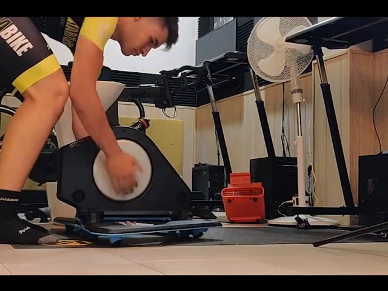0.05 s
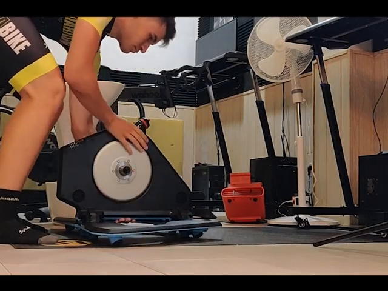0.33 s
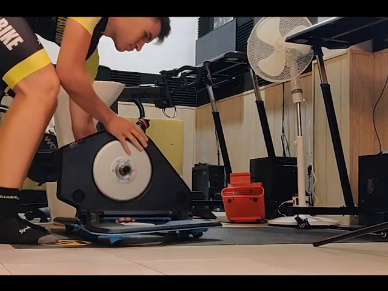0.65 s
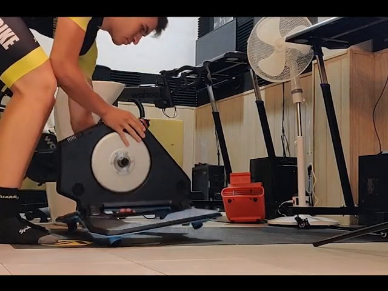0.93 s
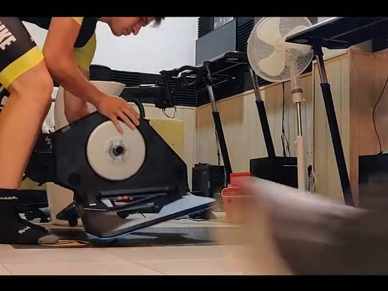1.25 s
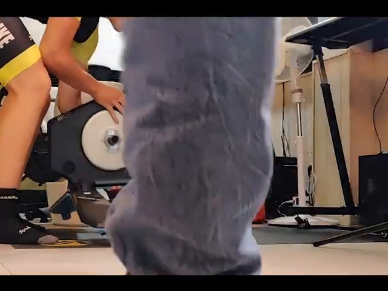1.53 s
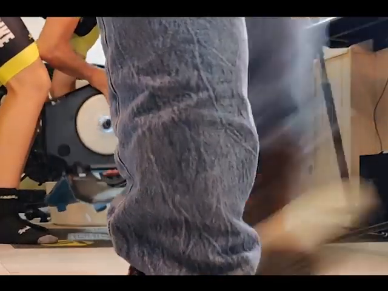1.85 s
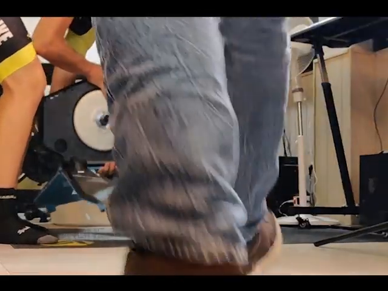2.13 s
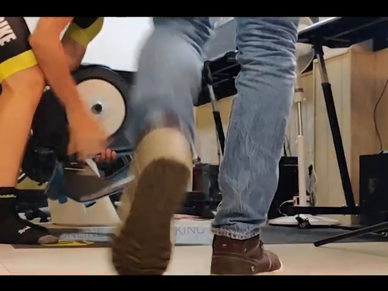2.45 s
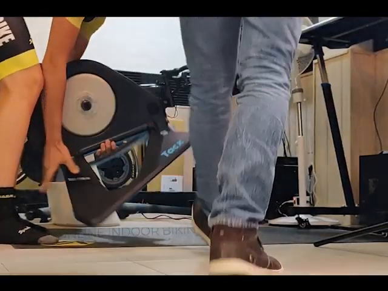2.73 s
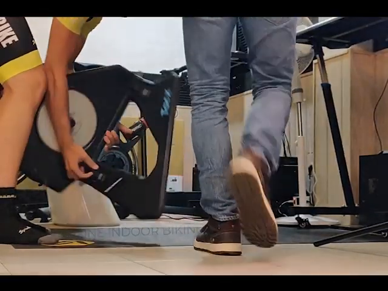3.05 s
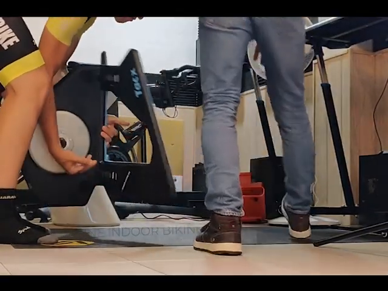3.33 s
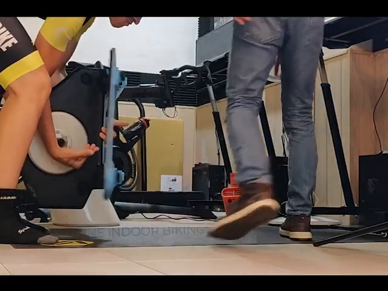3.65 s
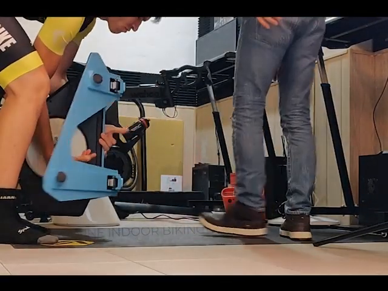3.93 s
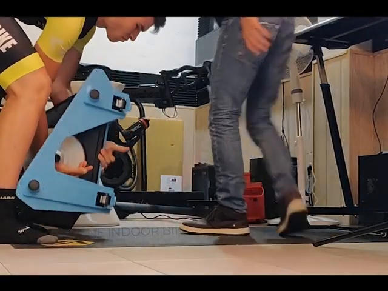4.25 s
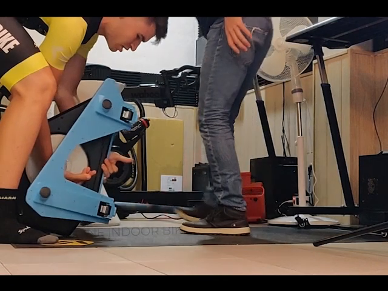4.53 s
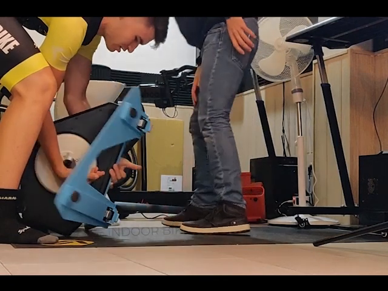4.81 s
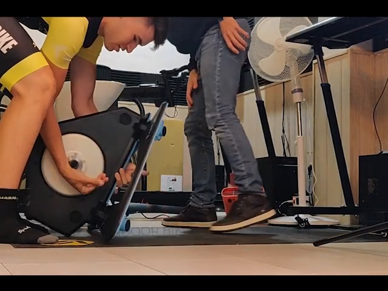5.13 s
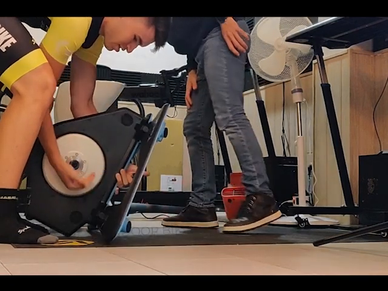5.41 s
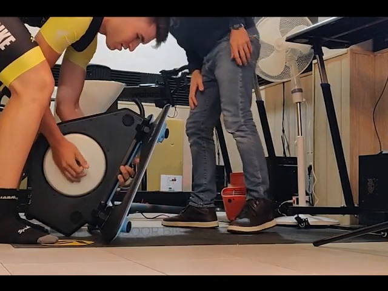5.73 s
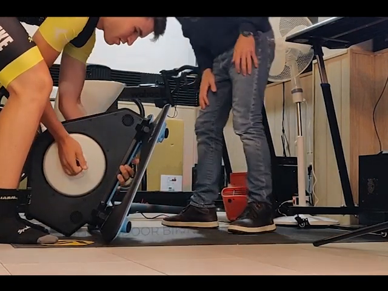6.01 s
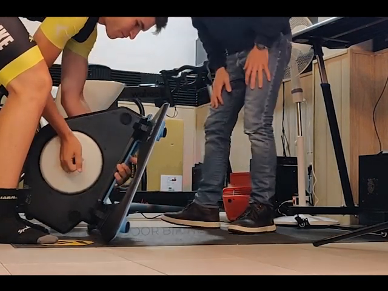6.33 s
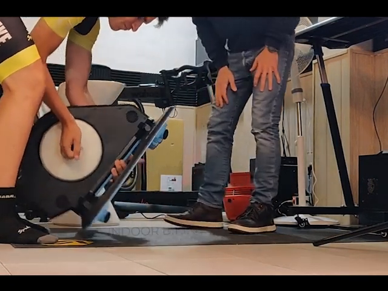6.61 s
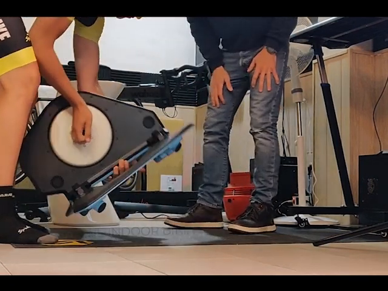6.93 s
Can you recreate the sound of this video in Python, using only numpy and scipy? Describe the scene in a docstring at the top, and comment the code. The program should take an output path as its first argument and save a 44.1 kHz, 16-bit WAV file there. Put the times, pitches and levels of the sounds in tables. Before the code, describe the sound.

Close to the microphone in a small room, the hollow plastic housing of an exercise trainer knocks and rattles as it is handled. Soft bumps and a few passing footsteps lead to several groups of hard clacks from its hinges and latches. After the loudest clatter the base settles with a brief low rumble, and small knocks and one more click trail off. Faint rubbing, creaking and a low ventilation hum lie underneath.

```python
"""A folded exercise trainer is lifted, turned and its legs swung open, near a phone on a shop floor.
Blows excite the damped modes of its hollow plastic housing, and the harder ones rattle its hinges.
Hinges and latches snap in bursts of tiny impacts; hands and clothes rub and creak by stick-slip friction.
Someone walks past close by, each heel a damped thump, and the base rumbles as it settles on the mat.
The short reverberation of the small room and a quiet ventilation noise lie around it."""
import sys
import numpy as np
from scipy import signal
from scipy.fft import rfft, irfft
from scipy.io import wavfile
from scipy.ndimage import uniform_filter1d

SR = 44100
rng = np.random.default_rng(int(sys.argv[2]) if len(sys.argv) > 2 else 0)


def unload_audio(sound):
    """Save the sound as a 16-bit wav file, at the path given as the first command line argument."""
    columns = np.transpose(np.atleast_2d(sound))
    # keep every value between -1 and 1, then stretch to whole-number steps
    steps = np.round(np.clip(columns, -1, 1) * 32767)
    wavfile.write(sys.argv[1], SR, steps.astype(np.int16))


N = 311787
TIME = np.arange(N) / SR
AGE = TIME[:SR // 2]  # time since an impact, s
REFERENCE_DB, REFERENCE_HZ = -30, 450  # the typical blow, from which the others are scaled

# blows on the housing: t/s, body level/dB, clatter level/dB, favoured f/Hz
KNOCKS = [ (0.005, -58, -44, 1010), (0.108, -54, -45, 470), (0.699, -40.5, -47, 302),
          (0.735, -50, -41, 900), (0.902, -39, -41.5, 620), (1.158, -39, -47.5, 290),
          (1.368, -42.5, -42, 534), (1.922, -42, -45, 312), (2.076, -31.5, -50, 270),
          (2.399, -47, -57, 167), (2.569, -38, -43, 470), (2.699, -43.5, -49.5, 470),
          (2.844, -41, -46.5, 187), (2.884, -29.5, -45, 330), (2.931, -11, -14, 516),
          (2.943, -14, -24.5, 420), (2.966, -31, -36, 189), (3.058, -25.5, -30, 724),
          (3.094, -29, -32, 894), (3.341, -41.5, -35, 680), (3.362, -34.5, -41.5, 423),
          (3.502, -13.5, -18, 536), (3.575, -34, -31, 503), (3.758, -13.5, -30.5, 485),
          (3.765, -13.5, -24, 453), (4.498, -31.5, -37, 507), (4.519, -25, -27.5, 330),
          (4.54, -28.5, -43, 224), (4.85, -34.5, -45.5, 383), (4.863, -34, -46.5, 510),
          (5.056, -46.5, -39.5, 333), (5.129, -6.5, -12.5, 514), (5.15, -13, -15, 396),
          (5.174, -10, -21, 378), (5.286, -25, -27, 940), (5.292, -24, -50, 380), (5.544, -44.5, -52, 288),
          (5.605, -58, -46.5, 820), (5.783, -41.5, -50, 343), (5.805, -37, -47, 527),
          (6.018, -40, -46.5, 364), (6.153, -43, -45.5, 372), (6.24, -43.5, -44, 339),
          (6.45, -43.5, -47, 360), (6.983, -49, -46, 390)]
# hinge and latch snaps: t/s, steel level/dB, plastic level/dB, sizzle level/dB, chatter T60/s
SNAPS = [(0.9673, -27.5, -44, -30.5, 0.025), (0.9701, -26.5, -26.5, -41, 0.022),
         (2.879, -47.5, -50, -60, 0.036), (2.9304, -15.5, -15, -25, 0.063), (3.623, -42, -39, -56, 0.11),
         (3.638, -40, -37.5, -46, 0.015), (4.5018, -45, -50.5, -45, 0.14),
         (4.6477, -30.5, -27.5, -31.5, 0.064), (4.6736, -33, -42, -51, 0.062),
         (4.9656, -45, -42, -57, 0.08), (5.1051, -15, -22.5, -22, 0.081), (5.1243, -41, -17, -41, 0.087),
         (6.3156, -31.5, -37, -41, 0.064), (6.338, -29, -31, -36.5, 0.035)]
# modes of the housing: f/Hz, level/dB, ring time as a multiple of the blow's
HOUSING_MODES = [(111, -34, 0.53), (159.2, 3, 2.96), (226, -29, 3.5), (273.7, 1, 1.43), (356.6, -1.5, 2.15),
                 (401, -1, 1.8), (428.5, 0.5, 1.63), (518.6, 7, 0.99), (566, -12.5, 3.4), (678, -3.5, 1.3),
                 (794, -5, 1.7), (810, 1, 0.62), (895, 0, 0.66), (1000, -3.5, 0.41), (1051, -4, 1.06),
                 (1138, -13, 2.7), (1280, -11.5, 0.99), (1536, -4.5, 0.27), (1750, -19.5, 1.3),
                 (1870, -23, 1.4), (2140, -29, 1.2)]


def housing_knocks(body_db=-5, boom_db=-6, clatter_db=-6, panel_db=-4, focus_octaves=0.21):
    """Modal superposition: each blow rings the shell. Returns the direct sound and the room's share."""
    # spectrum of the dense, weak panel modes: f/Hz, level/dB
    panel_spectrum = [(80, -22.5), (300, 3.5), (550, 3), (1000, -9.5), (1600, -11), (2500, -23.5),
                      (4000, -39.5)]
    out, to_room = np.zeros(N), np.zeros(N)
    mode_hz, mode_db, ring_ratio = np.transpose(HOUSING_MODES)
    for s, db, high_db, pitch in KNOCKS + latch_kicks():
        low_db, t60, wet_db = shell_response(db, pitch)
        push_s = 0.00044 * 2 ** ((db - high_db) / 7.5)  # a padded contact clatters less, pushes longer
        emphasis = 1 + 3 * np.exp(-(np.log2(mode_hz / pitch) / focus_octaves) ** 2)
        gains = undb(mode_db) * emphasis * rng.choice([-1, 1], len(mode_hz))
        tuning = mode_hz * (1 + 0.013 * rng.standard_normal(len(mode_hz)))  # the grip shifts the modes
        modes = np.array([g * ring(hz, t60 * k) for g, hz, k in zip(gains, tuning, ring_ratio)])
        panel_noise = colour(rng.standard_normal(SR), panel_spectrum)
        parts = [(90, 245, low_db + boom_db, 0.0024),  # heavy base, slow to move
                 (245, 720, db + body_db, push_s),  # hollow shell
                 (720, 3000, high_db + clatter_db, 0.00064)]  # thin covers
        for lo, hi, part_db, rise_s in parts:
            tones = modes[(mode_hz >= lo) & (mode_hz < hi)].sum(0)
            panels = cut(panel_noise, [lo, hi], "band", order=3)[-len(AGE):] * fade(t60 * 0.99)
            ringing = level(tones, 0, size=900) + level(panels, panel_db, size=900)
            onset = 1 - np.exp(-(AGE / rise_s) ** 2)
            part = level(ringing * onset, part_db, size=900)
            add(out, s, part * undb(-3 if hi > 1000 else 0))  # the covers radiate mostly sideways
            add(to_room, s, part * undb(wet_db))
    return cut(out, 98, "high"), to_room


def shell_response(db, pitch):
    """Excitation and damping: a blow's strength and pitch set its boom, ring time and room share."""
    force_db = db - REFERENCE_DB
    boom_db = -46.5 + 0.76 * force_db - 12.5 * np.log2(pitch / REFERENCE_HZ)  # low blows move the base
    t60 = 0.078 * 2 ** (-force_db / 84)  # a firmer grip damps the shell
    wet_db = -2 - 0.16 * force_db  # light touches blur into the room
    return boom_db, t60, wet_db


def latch_kicks(delay_s=0.002944, hz=387):
    """Reaction force: each snap kicks the housing around the latch. Rows as in KNOCKS."""
    return [(s + delay_s, plastic_db - 1, plastic_db - 3.5, hz) for s, _, plastic_db, _, _ in SNAPS]


def latch_snaps(grain_db=6.0, crack_t60=0.0093, contact_s=0.00088):
    """Impact chatter: a hard contact and a dying train of tiny impacts excite steel and plastic."""
    # spectrum of a snap: f/Hz, level/dB
    snap_spectrum = [(300, -9), (1000, 10), (2100, 5.5), (3300, 1), (4600, -6), (5700, -5), (6600, 2.5),
                     (8000, -5), (9600, -12), (11500, -3.5), (13500, 1), (16000, -7.5)]
    # modes of the steel latch parts: f/Hz, level/dB, T60/s
    latch_modes = [(5450, 4, 0.014), (6430, 10, 0.024), (6670, -8, 0.039), (7300, -16, .04)]
    # modes of the plastic catches: f/Hz, level/dB, T60/s
    catch_modes = [(1160, -1, 0.053), (1750, -7, 0.039), (2018, 1, 0.029), (2340, -6, 0.046),
                   (3100, -8, 0.027)]
    out = np.zeros(N)
    for s, steel_db, plastic_db, sizzle_db, t60 in SNAPS + hinge_rattles():
        impacts = undb(grain_db * np.repeat(rng.standard_normal(len(AGE) // 16 + 1), 16)[:len(AGE)])
        envelope = (fade(t60) + 0.69 * fade(crack_t60)) * (1 - np.exp(-AGE / contact_s))
        chatter = rng.standard_normal(len(AGE)) * impacts * envelope
        click = colour(flatten(chatter[None], bins=51)[0], snap_spectrum)
        steel = level(cut(click, [4200, 9000], "band", order=3), 0, size=500)
        steel += level(struck(latch_modes, detune=0.038), -10, size=500)
        plastic = level(cut(click, [110, 4000], "band", order=4), 0, size=500)
        plastic += level(struck(catch_modes, detune=0.031), -5, size=500)
        sizzle = cut(click, 9500, "high", order=4)
        for part, db in (steel, steel_db - 7.5), (plastic, plastic_db - 5), (sizzle, sizzle_db - 4):
            add(out, s, level(part, db, size=500))
    return out


def hinge_rattles(threshold_db=-41.5, slope=0.19, t60=0.047):
    """Backlash: hard knocks shake the loose hinges, whose play limits the level. Rows as in SNAPS."""
    shaken = [(s, -46 + slope * (clatter_db - REFERENCE_DB))
              for s, _, clatter_db, _ in KNOCKS if clatter_db > threshold_db]
    return [(s, db, db + 4, db - 13, t60) for s, db in shaken]


def footsteps(thump_t60=0.017, heel_hz=330, heel_t60=0.0056, tap_t60=0.0008, scuff_t60=0.08):
    """Damped impact: a rubber heel gives a short push and a thump, and the sole scuffs briefly."""
    # shoes on the floor: t/s, level/dB, thump f/Hz, heel cutoff f/Hz, relative scuff level/dB
    footfalls = [(0.634, -38, 132.4, 405, -12), (1.4525, -20.5, 158, 1070, -17.5),
                 (1.551, -35, 150, 1050, -1), (1.617, -43, 140, 494, -6), (2.241, -34, 155, 844, -5)]
    out = np.zeros(N)
    for s, db, thump_hz, cutoff_hz, scuff_db in footfalls:
        push = ring(thump_hz, thump_t60) + ring(heel_hz, heel_t60) + undb(6) * fade(tap_t60)
        scuff = undb(scuff_db) * rng.standard_normal(len(AGE)) * fade(scuff_t60)
        cushioned = cut(push + scuff, cutoff_hz, "low", order=3)  # a harder heel passes more treble
        add(out, s, -level(cut(cushioned, 109, "high"), db, size=600))
    return out


def mat_shudders(band_ratio=1.64):
    """Damped vibration: a band of low noise dies away as the base settles on the mat."""
    # the weight coming down: t/s, level/dB, T60/s, centre f/Hz
    settlings = [(4.509, -41, 1, 51), (5.136, -36, 0.43, 110)]
    out = np.zeros(N)
    for s, db, t60, hz in settlings:
        rumble = cut(rng.standard_normal(len(AGE)), [hz / band_ratio, hz * band_ratio], "band")
        add(out, s, level(rumble * fade(t60), db, size=4000))
    return out


def rubbing(uneven_db=4.5, flutter_db=0.5, grain_db=1.5):
    """Friction noise: sliding surfaces catch and slip, so the drag is grainy."""
    # spectrum of a hand on plastic: f/Hz, level/dB
    hand_spectrum = [(100, -7), (160, -2), (220, -3), (350, 5), (550, 2), (900, -3), (1800, -11),
                     (3000, -46.5)]
    # spectrum of sliding cloth: f/Hz, level/dB
    cloth_spectrum = [(700, -8), (1800, 1.5), (3000, -3), (4600, -5.5), (6800, 2.5), (9500, -13.5),
                      (13500, -7.5), (16000, -6.5)]
    rub, swish = sliding()
    grain = undb(grain_db * wander(400))
    drag = level(colour(diffuse(N), hand_spectrum), 0) * rub * undb(uneven_db * wander(36))
    cloth = level(colour(diffuse(N), cloth_spectrum), 0) * swish * undb(flutter_db * wander(82))
    return (drag + cloth) * grain


def creaks(rate_hz=45, scatter_db=5, burst_t60=0.016, ring_t60=0.043):
    """Stick-slip: sliding plastic lets go in irregular ticks that ring the thin covers."""
    rub, _ = sliding()
    slips = (rng.random(N) < rate_hz / SR) * undb(scatter_db * rng.standard_normal(N).clip(-2, 1))
    bursts = signal.fftconvolve(slips, fade(burst_t60))[:N] * rng.standard_normal(N)
    cover_modes = [(hz, db, ring_t60 * k) for hz, db, k in HOUSING_MODES if hz > 950]
    covers = signal.fftconvolve(slips, struck(cover_modes, detune=0.024))[:N]
    ticks = level(cut(bursts, [700, 2500], "band"), 0) + level(covers, -2)
    return level(ticks, -3) * rub / 2


def sliding(grip_rub_db=-65, grip_swish_db=-68.5):
    """Friction envelopes, rub and swish: each slide swells above a grip that never quite rests."""
    # hands, soles and clothes sliding: middle t/s, half length/s, rub level/dB, swish level/dB
    slides = [(0.37, 0.16, -68, -58), (0.732, 0.066, -46.5, -57), (1.512, 0.16, -58, -61),
              (1.807, 0.057, -53, -71), (2.088, 0.04, -39.5, -50), (2.34, 0.093, -50.5, -57.5),
              (2.603, 0.035, -54, -59), (2.91, 0.017, -43, -59), (3.405, 0.42, -57, -71),
              (3.657, 0.036, -53, -58), (4.302, 0.075, -54, -65.5), (4.63, 0.035, -47, -78),
              (5.63, 0.2, -61.5, -64.5), (6.47, 0.058, -53.5, -76), (6.803, 0.06, -68, -59)]
    swells = np.array([np.exp(-((TIME - s) / half) ** 2) for s, half, _, _ in slides])
    return undb(np.transpose(slides)[2:]) @ swells + undb([[grip_rub_db], [grip_swish_db]])


def direct_path(x, lag_samples=2):
    """Path difference: the direct sound reaches the left microphone first."""
    return np.array([x, np.roll(x, lag_samples)])


def room(x, wet_db, gap_s=0.00067, build_s=0.00064, early_db=-3, early_t60=0.085):
    """Reverberation: floor and furniture reflect at once, then each octave decays at its own rate."""
    # reverberation time of the shop: f/Hz, T60/s
    decay_times = [(100, 0.66), (400, 0.25), (1500, 0.36), (6500, 0.51), (15000, 0.19)]
    noise = rfft(diffuse(len(AGE)))
    octave = np.log2(np.fft.rfftfreq(len(AGE), 1 / SR).clip(125, 16000) / 125)
    bands = [irfft(noise * (1 - abs(octave - k)).clip(0), len(AGE)) for k in range(8)]
    tail = sum(band * fade(lookup(decay_times, 125 * 2 ** k)) for k, band in enumerate(bands))
    tail = flatten(tail * (1 + undb(early_db) * fade(early_t60)))
    tail *= np.cos(np.pi / 2 * AGE / AGE[-1]) ** 2  # it ends in silence
    tail *= 1 - np.exp(-(AGE - gap_s).clip(0) / build_s)
    tail *= undb(wet_db) / np.sqrt(np.sum(tail ** 2) / 2)
    return signal.fftconvolve(x[None], tail, axes=1)[:, :N]


def ventilation(db=-53.5, wander_db=1.8):
    """Diffuse broadband noise: the ventilation hums low, its level wandering slowly."""
    # spectrum of the ventilation: f/Hz, level/dB
    spectrum = [(15, -23), (25, -4), (97, -6.5), (166, -2), (212, -5.5), (301, -0.5), (451, -10),
                (936, -11), (1100, -18), (2160, -18.5), (4610, -24.5), (5000, -24), (5430, -27),
                (5880, -25), (16000, -32)]
    return level(colour(diffuse(N), spectrum), db) * undb(wander_db * wander(2.587))


def diffuse(size, spacing_m=0.19):
    """Diffuse-field coherence: noise at two microphones is alike in the bass, unrelated in the treble."""
    coherence = .93 * np.sinc(2 * np.fft.rfftfreq(size, 1 / SR) * spacing_m / 343)
    mid, side = rfft(rng.standard_normal((2, size))) * np.sqrt([1 + coherence, 1 - coherence])
    return irfft([mid + side, mid - side], size) / 2


def flatten(x, bins=41):
    """Spectral smoothing: evens out the noise's narrow peaks, so no stray tones stand out."""
    spectrum = rfft(x, 2 * len(AGE))
    power = np.mean(abs(spectrum) ** 2, axis=0)
    gain = np.sqrt(uniform_filter1d(power, 10 * bins) / uniform_filter1d(power, bins))
    return irfft(spectrum * gain)[:, :len(AGE)]


def struck(modes, detune):
    """Free vibration of a small part; every contact shifts its modes a little."""
    return sum(undb(db) * ring(hz * (1 + detune * rng.standard_normal()), t60) * rng.choice([-1, 1])
               for hz, db, t60 in modes)


def ring(hz, t60):
    """Damped oscillation of one mode."""
    return np.sin(2 * np.pi * hz * AGE) * fade(t60)


def fade(t60):
    """Exponential decay, 60 dB in t60 seconds."""
    return np.exp(-np.log(1000) * AGE / max(t60, 1e-3))


def wander(rate_hz):
    """Smooth random modulation of unit rms."""
    hold = int(SR / rate_hz)
    stairs = np.repeat(rng.standard_normal(N // hold + 1), hold)
    return level(uniform_filter1d(stairs, hold)[:N], 0)


def colour(x, points, size=2048):
    """Minimum-phase filter through the points f/Hz, level/dB."""
    cepstrum = irfft(np.log(undb(lookup(points, np.fft.rfftfreq(size, 1 / SR)))))
    cepstrum[1:size // 2] *= 2  # folding the cepstrum makes the response causal
    cepstrum[size // 2 + 1:] = 0
    impulse_response = irfft(np.exp(rfft(cepstrum)))
    return np.apply_along_axis(signal.fftconvolve, -1, x, impulse_response)[..., :x.shape[-1]]


def cut(x, hz, kind, order=2):
    """Maximally flat filter."""
    return signal.sosfilt(signal.butter(order, hz, kind, fs=SR, output="sos"), x)


def lookup(points, hz):
    """Interpolation on a log-frequency axis."""
    f, value = np.transpose(points)
    return np.interp(np.log(hz + 1), np.log(f), value)


def level(x, db, size=None):
    """Scaling that sets the rms of the first size samples."""
    return x * undb(db) / np.sqrt(np.mean(x[..., :size] ** 2) + 1e-20)


def undb(db):
    """Decibels to amplitude ratio."""
    return 10 ** (np.asarray(db) / 20)


def add(track, s, sound):
    """Superposition of a sound on a track at time s."""
    start = max(int(s * SR), 0)
    track[start:start + len(sound)] += sound[:N - start]


def scene():
    """Direct and reverberant fields of trainer and steps add to the rubbing and ventilation."""
    housing, housing_to_room = housing_knocks()
    latches, feet, ticks, air = latch_snaps(), footsteps(), creaks(), ventilation()
    near = direct_path(housing + latches + feet + ticks + mat_shudders())
    walls = room(housing_to_room, wet_db=1) + room(latches + ticks, wet_db=2)
    walls += room(cut(feet, 240, "high", order=1), wet_db=-5)
    return near + walls + rubbing() + air


def record(dry, top_hz=16350):
    """Transduction: two unequal microphone ports, full-scale clipping and a steep low-pass."""
    # imbalance of the ports: f/Hz, left minus right level/dB
    imbalance = [(50, 4), (200, 1.5), (400, 5.5), (700, 3), (1500, 1), (4000, 4), (6800, 4), (9300, -5.5),
                 (12500, 0), (16000, 1)]
    ports = np.array([colour(x, [(hz, side * db / 2) for hz, db in imbalance])
                      for x, side in zip(dry, (1, -1))])
    return signal.sosfilt(signal.ellip(10, .2, 70, top_hz, fs=SR, output="sos"), ports.clip(-1, 1))


dry = scene()
out = record(dry)
unload_audio(out)
```